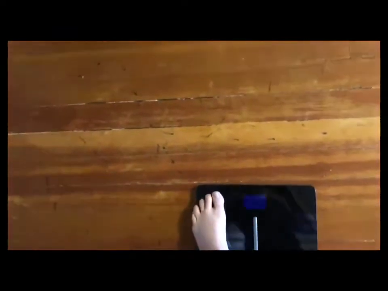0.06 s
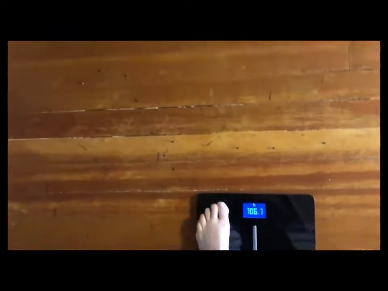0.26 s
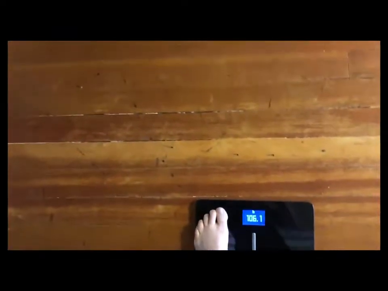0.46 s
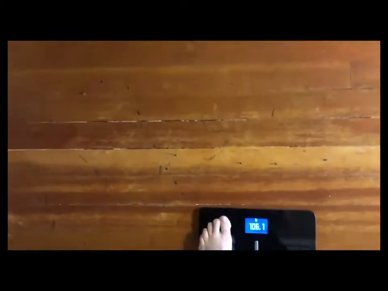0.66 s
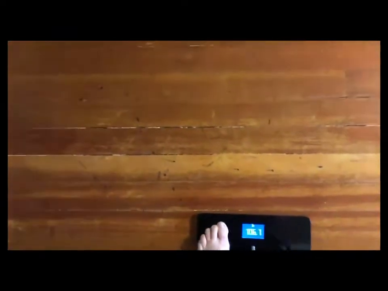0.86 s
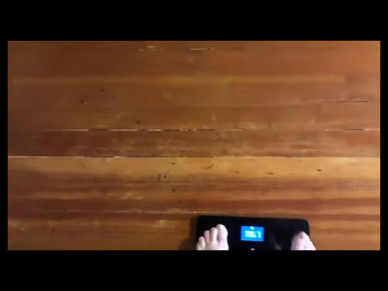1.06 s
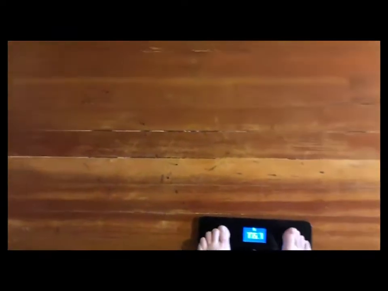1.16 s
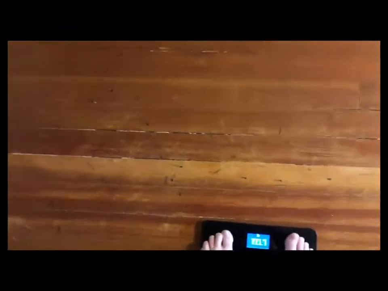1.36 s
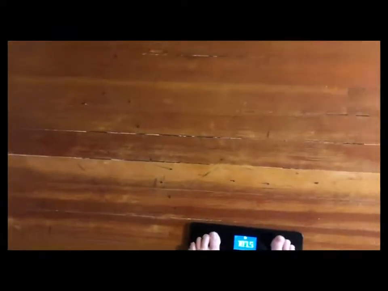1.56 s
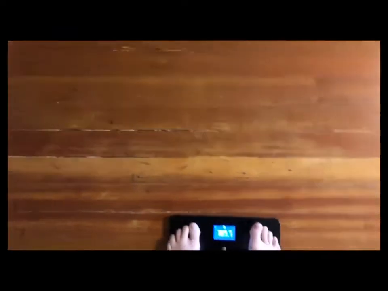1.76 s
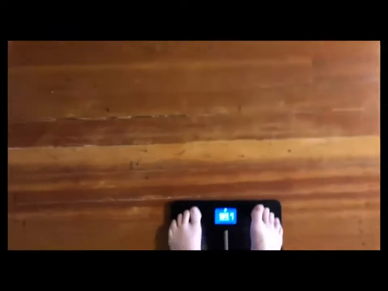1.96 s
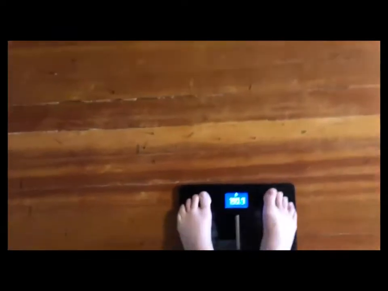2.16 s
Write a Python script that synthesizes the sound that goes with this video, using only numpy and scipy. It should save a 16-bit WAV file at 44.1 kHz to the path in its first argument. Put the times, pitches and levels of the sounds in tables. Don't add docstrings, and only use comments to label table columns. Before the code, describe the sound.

Hard clacking thump of a bathroom scale under a bare foot on a wood floor, then near quiet

```python
import sys
import numpy as np
from scipy import signal
from scipy.fft import rfft, irfft
from scipy.io import wavfile
from scipy.ndimage import uniform_filter1d

SR = 44100
rng = np.random.default_rng(int(sys.argv[2]) if len(sys.argv) > 2 else 0)


def digitize_waveform(pressure):
    field = np.atleast_2d(pressure).T
    bounded = np.clip(field, -1, 1)
    quanta = np.round(bounded * 32767).astype(np.int16)
    wavfile.write(sys.argv[1], SR, quanta)


def invert_db(x):
    u = np.asarray(x, float) / 20
    return 10 ** u


N = 97902

# (frequency [Hz], level [dB rms])
HUM_LINES = [(120.1, -76), (240.1, -66), (900, -83), (1278, -83.5)]
# (low [Hz], high [Hz], level [dB rms], fade [dB/s])
RUMBLE_BANDS = [(38.4, 63, -72.5, 3.5), (99, 131, -66, 2), (150, 240, -73.5, -1)]
# (frequency [Hz], density [dB per Hz])
AIR_SPECTRUM = [(25, -14), (60, -3), (220, -6.5), (320, -8), (700, -16), (1300, -16), (2500, -23),
                (15500, -37)]
# (frequency [Hz], t60 [s], level [dB])
ROOM_TAIL = [(63, .42, -22.5), (190, 0.28, 12.5), (485.8, 0.48, -9.5), (900, 0.39, -0.5), (1411, 0.38, 2.5),
             (4000, 0.35, -7), (7400, 0.087, -3), (14000, 0.15, -16)]
# (start [s], peak [s], end [s], level [dB], dull above [Hz])
SCUFFS = [
    (0.325, 0.34, 0.35, -76, 14000),
    (0.44, 0.568, 0.63, -60, 1100),
    (0.848, 0.918, 1.018, -56.5, 1850),
    (0.853, 0.918, 1.2, -74.5, 14000),
    (1.215, 1.206, 1.285, -65.5, 4000),
    (1.389, 1.385, 2.9, -78.5, 2480),
    (1.588, 1.619, 1.75, -62.5, 1190),
    (1.592, 1.597, 1.847, -71.5, 5770),
]
# (time [s], level [dB], length [s])
SKIN_TICKS = [
    (0.859, -62, 0.0013),
    (0.8615, -49.5, 0.0025),
    (0.8838, -49.5, 0.00085),
    (.8905, -58, .0008),
    (0.9046, -47, 0.00061),
    (0.9195, -54, .0008),
    (0.9264, -50.5, 0.0004),
    (.932, -54, 0.00064),
    (0.94, -68, 0.002),
    (1.2103, -46.5, 0.0013),
]
# (time [s], level [dB], ring [Hz], t60 [s])
TOE_TAPS = [
    (0.49, -52, 820, 0.034),
    (1.096, -54.5, 627, 0.058),
    (1.2103, -42.5, 1370, 0.0064),
    (1.2118, -41, 900, 0.04),
    (1.35, -56, 291, 0.08),
    (1.465, -50.5, 414, 0.031),
    (1.596, -50, 826, 0.043),
    (1.884, -53, 158, 0.098),
]
# (frequency [Hz], start [s], rise [s], t60 [s], level [dB])
JOIST_HEAVE = (50, .04, .03, 0.27, -43)
# (frequency [Hz], density [dB per Hz])
RATTLE_SPECTRUM = [(100, -22), (350, 4), (700, -5), (1200, -7), (2400, -6), (4200, -9), (6500, -22),
                   (15000, -31)]
# (frequency [Hz], level [dB], t60 [s])
BOARD_MODES = [(150, -24.5, 0.089), (187.8, -14, 0.044), (229.5, -16, 0.13), (286.2, -7, .08),
               (342.6, 3, 0.061), (417.4, 1, 0.1), (445, -5.5, 0.12), (481, -1.5, 0.024), (597, -1.5, .05),
               (893, -4, 0.017)]
# (frequency [Hz], level [dB], t60 [s])
PLATE_MODES = [(940, -5, 0.06), (1190, -5, 0.039), (1430, -11.5, .02), (1862, -4, 0.015), (2334, 6, 0.013),
               (2835, 9, .009), (3800, 3.5, 0.0033), (4730, -4, 0.004), (9870, -11.5, 0.0054)]
# (time [s], clap [dB], boom [dB])
BLOWS = [
    (.0021, -12, -34.5),
    (.0033, -8.5, -23.5),
    (.0058, -19.5, -18.5),
    (.0082, -22.5, -13.5),
    (0.0191, -26.5, -19.5),
    (.031, -28.5, -21),
    (0.043, -29, -36.5),
    (0.047, -40.5, -13),
    (0.073, -41.5, -35.5),
]


def colour(x, hz, db):
    log_hz = np.log(np.arange(len(x) // 2 + 1) * SR / len(x) + 1)
    return irfft(rfft(x) * invert_db(np.interp(log_hz, np.log(hz), db)), len(x))


def unit(x):
    return x / np.sqrt(np.mean(x ** 2))


def band(x, lo_hz, hi_hz, order=2):
    sos = signal.butter(order, [lo_hz, min(hi_hz, SR / 2.2)], "band", fs=SR, output="sos")
    return signal.sosfilt(sos, x)


def ring(modes):
    t_s = np.arange(SR // 2) / SR
    luck = rng.standard_normal((len(modes), 2))
    out = np.zeros(len(t_s))
    for (hz, db, t60_s), (level_luck, pitch_luck) in zip(modes, luck):
        tone = np.sin(2 * np.pi * hz * (1 + 0.013 * pitch_luck) * t_s)
        out += invert_db(db + 2.5 * level_luck) * tone * np.exp(-np.log(1000) * t_s / t60_s)
    return out


def add(out, x, start_s, peak_db):
    i = max(int(start_s * SR), 0)
    x = x[:N - i]
    out[i:i + len(x)] += x * invert_db(peak_db) / np.abs(x).max()


def burst(decay_s):
    t_s = np.arange(SR // 50) / SR
    return rng.standard_normal(len(t_s)) * np.exp(-t_s / decay_s)


def push(length_s):
    return np.hanning(int(length_s * SR) + 3)


def flicker_db():
    walk = uniform_filter1d(rng.standard_normal(N), size=3000)
    return 0.4 * unit(uniform_filter1d(walk, size=3000))


def air():
    level_db, fade_db_per_s = -70, 1.2
    t_s = np.arange(N) / SR
    gain = invert_db(level_db - fade_db_per_s * (t_s - 3) + flicker_db())
    return gain * unit(colour(rng.standard_normal(N), *np.array(AIR_SPECTRUM).T))


def hum():
    t_s = np.arange(N) / SR
    out = np.zeros(N)
    for phase_rad, (hz, db) in enumerate(HUM_LINES):
        out += invert_db(db + flicker_db()) * np.sqrt(2) * np.sin(2 * np.pi * hz * t_s + phase_rad)
    return out


def rumble():
    t_s = np.arange(N) / SR
    out = np.zeros(N)
    for lo_hz, hi_hz, db, fade_db_per_s in RUMBLE_BANDS:
        out += invert_db(db - fade_db_per_s * t_s) * unit(band(rng.standard_normal(N), lo_hz, hi_hz))
    return out


def room(x):
    rise_s = 0.004
    t_s = np.arange(int(0.7 * SR)) / SR
    hz, t60_s, db = np.array(ROOM_TAIL).T
    tail = np.zeros(len(t_s))
    for f_hz in 40 * 2 ** (np.arange(18) / 2):
        band_db = np.interp(np.log(f_hz), np.log(hz), db)
        band_t60_s = np.interp(np.log(f_hz), np.log(hz), t60_s)
        noise = band(rng.standard_normal(len(t_s)), f_hz * 2 ** -0.25, f_hz * 2 ** 0.25)
        tail += invert_db(band_db - 60 * t_s / band_t60_s) * noise
    tail *= 1 - np.exp(-t_s / rise_s)
    return signal.fftconvolve(x, tail / np.sqrt(np.sum(tail ** 2)))[:N]


def scuffs():
    low_hz, grains_per_s, grain_db, edge_db = 417, 9000, 0.5, -33.5
    t_s = np.arange(N) / SR
    out = np.zeros(N)
    for start_s, peak_s, end_s, db, top_hz in SCUFFS:
        slips = rng.random(N) < grains_per_s / SR
        grains = slips * invert_db(grain_db * rng.exponential(size=N)) * rng.standard_normal(N)
        rub = unit(band(grains, low_hz, top_hz))
        rub += invert_db(edge_db) * unit(band(grains, 1295, 6400, order=1))
        out += invert_db(db) * np.interp(t_s, [start_s, peak_s, end_s], [0, 1, 0]) * rub
    return out


def skin_ticks():
    out = np.zeros(N)
    for tick_s, db, length_s in SKIN_TICKS:
        add(out, band(burst(length_s), 1400, 11300, order=1), tick_s, db)
    return out


def toe_taps():
    out = np.zeros(N)
    for tap_s, db, hz, t60_s in TOE_TAPS:
        body = ring([(hz, 0, t60_s), (0.647 * hz, -8, t60_s),
                     (1.49 * hz, -6, 0.82 * t60_s), (2.05 * hz, -6, 0.53 * t60_s)])
        add(out, signal.fftconvolve(body, push(0.00045)), tap_s, db)
    return out


def joist_heave():
    hz, start_s, rise_s, t60_s, db = JOIST_HEAVE
    t_s = np.arange(SR // 2) / SR
    out = np.zeros(N)
    swell = (1 - np.exp(-t_s / rise_s)) ** 2 * invert_db(-60 * t_s / t60_s)
    add(out, np.sin(2 * np.pi * hz * t_s) * swell, start_s, db)
    return out


def feet_rattle():
    delay_s, peak_db = 0.004, -8
    click = np.zeros(SR // 2)
    click[int(delay_s * SR)] = 1
    out = np.zeros(N)
    add(out, colour(click, *np.array(RATTLE_SPECTRUM).T)[:SR // 10], 0, peak_db)
    return out


def landing():
    clap_s, push_s = 0.00085, 0.002
    out = np.zeros(N)
    for blow_s, clap_db, boom_db in BLOWS:
        clap = signal.fftconvolve(ring(PLATE_MODES), burst(clap_s / 2))
        add(out, clap, blow_s, clap_db)
        boom = np.diff(signal.fftconvolve(ring(BOARD_MODES), push(push_s)))
        add(out, boom, blow_s, boom_db)
    return out


def scene():
    background = air() + hum() + rumble()
    light = scuffs() + skin_ticks() + toe_taps()
    blows = landing()
    wet = room(invert_db(-17) * blows + invert_db(-17) * light + feet_rattle())
    return (blows + joist_heave() + light + wet + background)[None]


def roll_off(x):
    return signal.sosfilt(signal.butter(12, 15830, fs=SR, output="sos"), x)


def record(dry):
    sos = signal.butter(4, 48, "high", fs=SR, output="sos")
    mix = signal.sosfilt(sos, dry)
    return roll_off(mix)


dry = scene()
out = record(dry)
digitize_waveform(out)
```